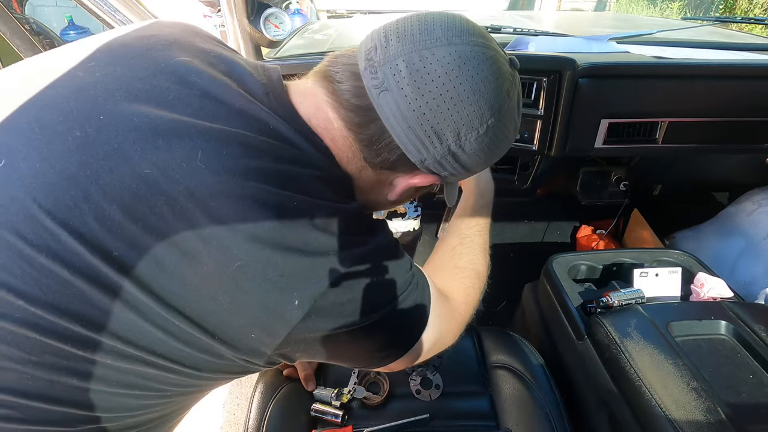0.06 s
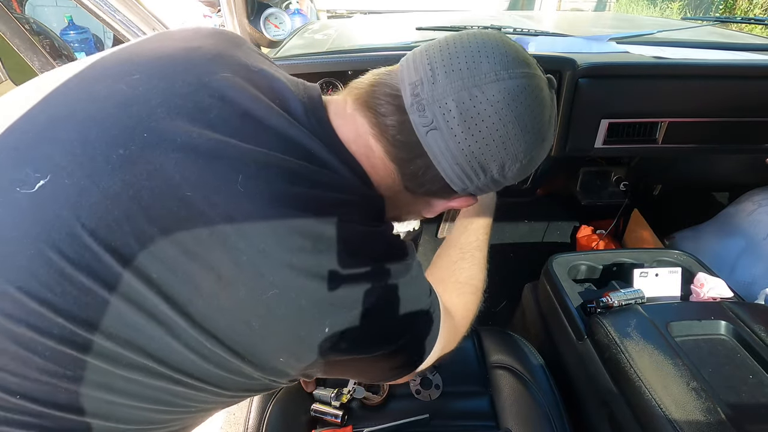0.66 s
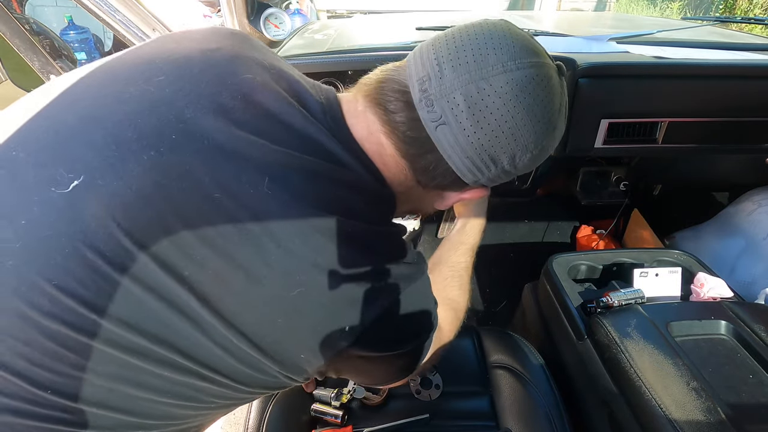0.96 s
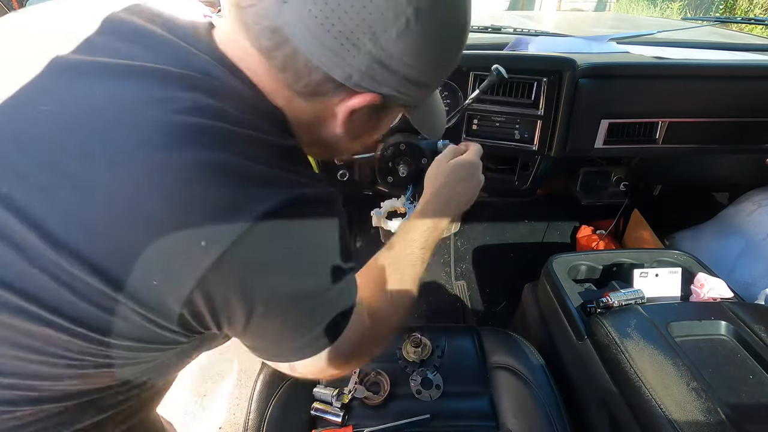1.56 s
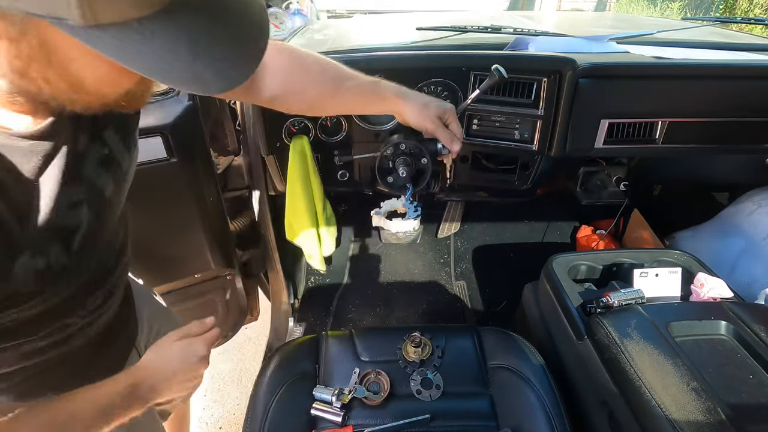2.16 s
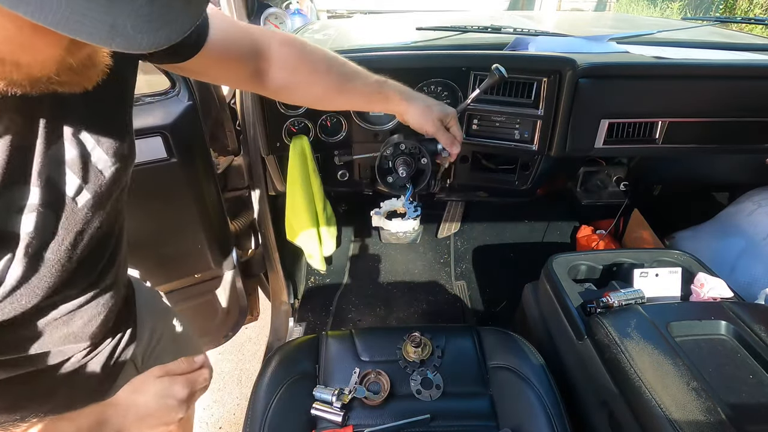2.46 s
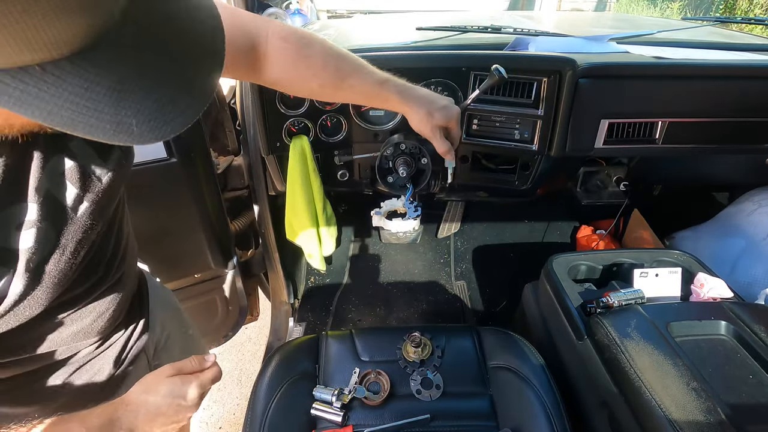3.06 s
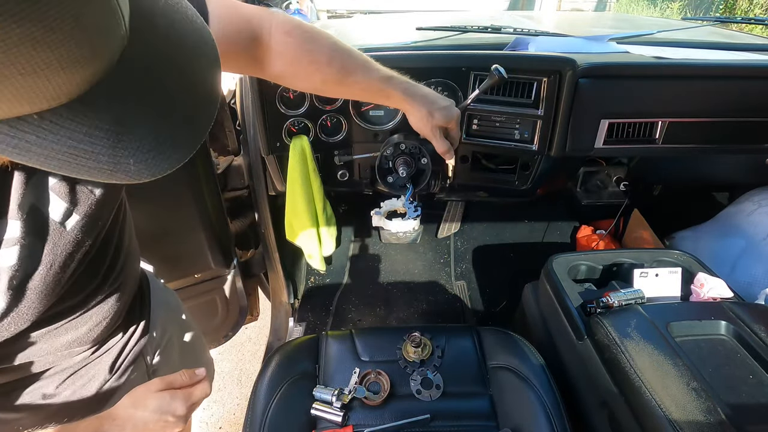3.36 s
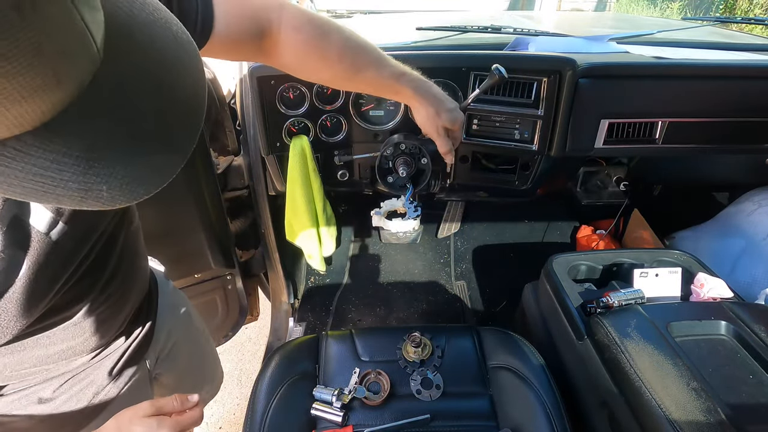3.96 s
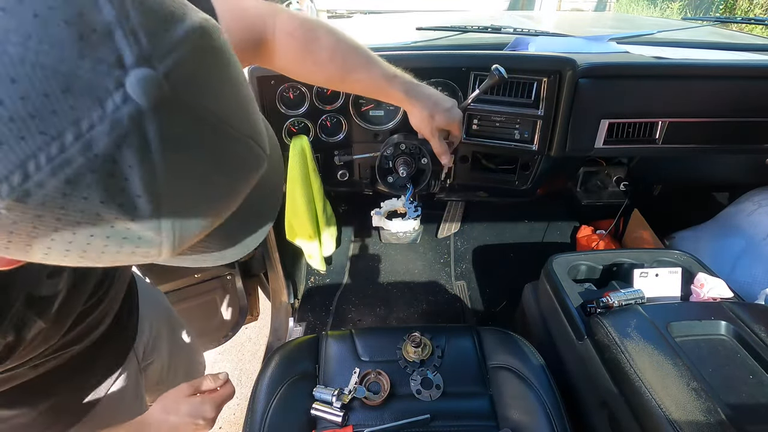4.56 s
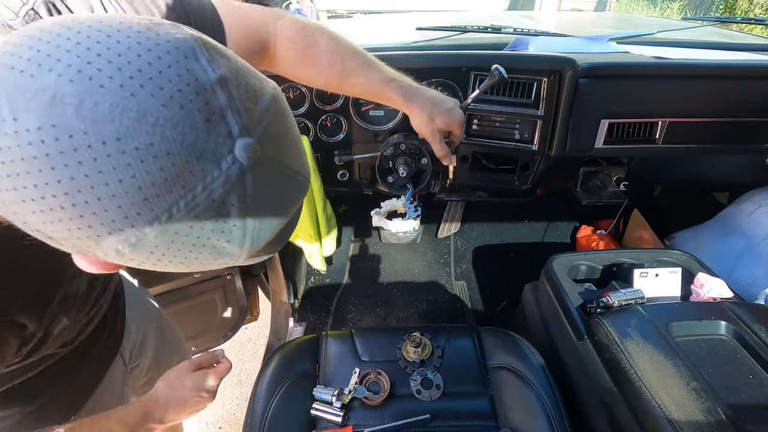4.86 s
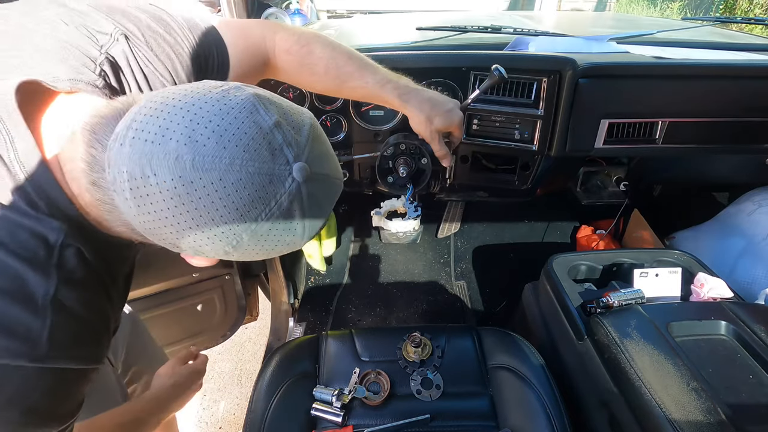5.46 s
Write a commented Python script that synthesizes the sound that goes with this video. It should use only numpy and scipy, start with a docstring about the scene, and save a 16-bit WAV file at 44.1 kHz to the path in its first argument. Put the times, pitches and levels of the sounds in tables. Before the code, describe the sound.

Inside a parked truck with the door open, someone works a lock cylinder into the steering column, heard up close. Scattered small clicks and a brief tinkle of keys grow into sharper snaps, clinks and short scrapes, mixed with hollow taps on plastic and soft bumps. The clicking thins out, and a dull, low thud lands near the end. A low throbbing rumble and faint clothing rustle continue underneath.

```python
"""A low, throbbing rumble and a rustle of clothes: a man leans into a parked truck, door open.
The cab sways under his weight and the outdoors hums in its air modes. Close up, he works a lock
cylinder into the steering column: metal clicks and scrapes, detents snap, keys tinkle on their ring,
and the small cab answers each contact. Knuckles rap the shroud, his body bumps column and seat,
and near the end his weight lands on the sill with a boom."""
import sys
import numpy as np
from scipy import signal
from scipy.fft import rfft, irfft
from scipy.io import wavfile
from scipy.ndimage import uniform_filter1d

SR = 44100
rng = np.random.default_rng(int(sys.argv[2]) if len(sys.argv) > 2 else 0)


def waveform_to_disk(signal):
    """Save audio, clipped to [-1, 1], as 16-bit WAV at the path in sys.argv[1]."""
    frames = np.transpose(np.atleast_2d(signal))
    scaled = np.clip(frames, -1, 1) * 32767
    samples = np.round(scaled).astype(np.int16)
    wavfile.write(sys.argv[1], SR, samples)


N = 251370
TIME = np.arange(N) / SR
AGE = np.arange(SR * 3 // 10) / SR   # seconds into a one-shot


def from_db(db):
    """Decibels to gain."""
    return 10 ** (np.asarray(db) / 20)


def rms(x):
    """Root mean square."""
    return np.sqrt(np.mean(x ** 2) + 1e-20)


def in_time(rows):
    """Each column of an automation curve at every sample."""
    times, *columns = np.transpose(rows)
    return [np.interp(TIME, times, column) for column in columns]


def at_hz(points, hz):
    """Gain of an EQ curve at the given frequencies."""
    f, db = np.transpose(points)
    return from_db(np.interp(np.log(hz + 1), np.log(f), db))


def add(out, s, sound):
    """Mix a stereo one-shot in at time s."""
    i = max(round(s * SR), 0)
    out[:, i:i + sound.shape[-1]] += sound[..., :max(N - i, 0)]


def attack(rise_s):
    """Exponential onset."""
    return 1 - np.exp(-AGE / rise_s)


def fade(t60):
    """Exponential decay, 60 dB down after t60 seconds."""
    return from_db(-60 * AGE / t60)


def stroke(start, end, edge_s):
    """A gate with sloped edges."""
    return np.clip(np.minimum(TIME - start, end - TIME) / edge_s, 0, 1)


def band(x, low_hz, high_hz, order=4):
    """Causal band-pass."""
    sos = signal.butter(order, [low_hz, min(high_hz, .45 * SR)], "band", fs=SR, output="sos")
    return signal.sosfilt(sos, x)


def stereo(mid, side):
    """Left and right from mid and side."""
    return np.array([mid + side, mid - side])


# Stereo width, side relative to mid: f/Hz, level/dB
WIDTH = [(30, -36), (120, -23), (250, -13), (500, -4.5), (2000, -5), (8000, -6.5), (13000, -4)]
def coloured(spectrum, size=N, grain=1):
    """Stereo noise of a given colour, wider in the treble; rms 1."""
    hz = np.arange(size // 2 + 1) * SR / size
    roll_off = 1 / (1 + (hz / spectrum[-1][0]) ** 4) / (1 + (spectrum[0][0] / (hz + 1)) ** 4)
    mid, side = rfft(rng.standard_normal((2, size)) * grain) * at_hz(spectrum, hz) * roll_off
    noise = stereo(irfft(mid, size), irfft(side * at_hz(WIDTH, hz), size))
    return noise / rms(noise)


def evened(x, span_s):
    """Noise with its slow swells levelled out."""
    power = uniform_filter1d(np.mean(x ** 2, axis=0), max(int(span_s * SR), 2))
    return x / np.sqrt(power + 1e-12)


def tilted(db, tilt, hz, pivot_hz=1820):
    """Level of a hit at a pitch: a sharp one favours the treble, a blunt one the bass."""
    return db + tilt * np.log2(hz / pivot_hz)


def struck(modes, pitch=1, spread_db=2, width=0.41, rise_s=0.00049):
    """One hit on a set of modes: each rings at its own strength, left and right a little out of step."""
    ring = 0
    for hz, db, t60 in modes:
        strength = from_db(db + spread_db * rng.standard_normal())
        phase = 2 * np.pi * (hz * pitch * AGE + rng.random()) + width * rng.standard_normal((2, 1))
        ring += strength * fade(t60) * np.sin(phase)
    return ring * attack(rise_s)


# The cab rocks as he leans and pushes: t/s, level/dB
ROCKING = [(0.0, -46), (0.44, -36), (0.73, -47.5), (0.93, -37), (1.0, -54), (1.41, -44), (1.48, -34),
           (1.65, -50.5), (2.24, -37.5), (2.36, -53), (2.44, -31.5), (3.13, -49.5), (3.48, -33),
           (4.29, -47), (5.12, -44.5), (5.26, -35), (5.32, -49), (5.7, -47.5)]
# Its sub-heavy colour: f/Hz, level/dB
ROCKING_SPECTRUM = [(21, -4.5), (37, -1), (52, -7), (70, -13), (105, -19), (160, -22), (300, -54)]
def rocking(jolt_db=7.5, jolt_rise_s=0.014, jolt_t60=0.58):
    """The cab sways under his weight, and every bump adds a jolt that dies away."""
    sway_db, = in_time(ROCKING)
    power = from_db(sway_db) ** 2
    for s, db in BUMPS:
        age = np.maximum(TIME - s, 0)
        jolt = from_db(db + jolt_db - 60 * age / jolt_t60) * (1 - np.exp(-age / jolt_rise_s))
        power += jolt ** 2
    return np.sqrt(power) * evened(coloured(ROCKING_SPECTRUM), 0.12)


# A low hum nearby throbs and speeds up: t/s, pulse rate/Hz, level/dB
THROB = [(0, 9.8, -52), (.7, 8.65, -49.5), (2, 11.1, -52.5), (3.9, 12, -60.5), (4.3, 11.6, -53.5),
         (5.7, 14.3, -55.5)]
def throb(hz=158, wander_hz=9, sharpness=5.2, lead_beats=0.045):
    """A low tone swells once a beat; its pitch wanders."""
    rate_hz, db = in_time(THROB)
    swell = np.abs(np.cos(np.pi * (np.cumsum(rate_hz) / SR + lead_beats))) ** sharpness
    wander = np.interp(TIME, np.linspace(0, TIME[-1], 120), rng.standard_normal(120))
    tone = swell * np.sin(2 * np.pi * np.cumsum(hz + wander_hz * wander) / SR)
    return from_db(db) * tone / rms(tone)


# The cab's air modes: f/Hz, bandwidth/Hz, level/dB
CAB_MODES = [(100.6, 52, -61.5), (155, 37.4, -52), (237.2, 16.6, -56.5), (316.7, 68, -61.5), (500, 84, -75)]
def cab_hum(follows=0.29):
    """Outdoor rumble hums in the cab's air modes, gently riding the throb's level."""
    out = np.zeros((2, N))
    for hz, width_hz, db in CAB_MODES:
        radius = np.exp(-np.pi * width_hz / SR)
        resonator = [1, -2 * radius * np.cos(2 * np.pi * hz / SR), radius ** 2]
        drive = rng.standard_normal((2, N + SR))   # a second of pre-roll lets the mode settle
        mid, side = signal.lfilter([1, 0, -1], resonator, drive)
        mode = band(stereo(mid, side * at_hz(WIDTH, hz)), hz / 2, hz * 1.38)[:, SR:]
        out += from_db(db) * evened(mode, 0.29)
    _, throb_db = in_time(THROB)
    return out * from_db(follows * (throb_db - throb_db.mean()))


# Sliding clothes and background: t/s, cloth level/dB, hiss level/dB
RUSTLE = [(0.0, -72, -74.5), (0.62, -62, -73.5), (0.92, -69, -68), (1.14, -69.5, -76), (2.02, -65.5, -66),
          (2.16, -67.5, -75), (2.57, -69, -71), (3.06, -70.5, -74.5), (3.57, -65, -71),
          (3.81, -69.5, -77.5), (4.02, -72.5, -80), (4.16, -69, -76.5), (4.38, -69, -74.5),
          (4.79, -66, -74.5), (5.24, -68, -69), (5.7, -67.5, -72.5)]
# The cloth's soft body: f/Hz, level/dB
CLOTH_SPECTRUM = [(350, 10), (600, -2), (850, -8), (1100, 2), (1350, 2.5), (1900, -4.5), (3300, -17),
                  (6000, -24)]
# The airy hiss on top: f/Hz, level/dB
HISS_SPECTRUM = [(2000, 2), (3500, -6.5), (5600, -2.5), (7000, -5.5), (9500, -14), (12300, -17),
                 (14000, -29)]
def rustle(catches_per_s=500, trim_db=1):
    """Threads catch and let go as his clothes slide: a grainy texture under a smooth hiss."""
    cloth_db, hiss_db = in_time(RUSTLE)
    fibres = (rng.random(N) < catches_per_s / SR) + 0.2
    cloth = from_db(cloth_db) * coloured(CLOTH_SPECTRUM, grain=fibres)
    hiss = from_db(hiss_db) * coloured(HISS_SPECTRUM)
    return from_db(trim_db) * (cloth + hiss)


# Metal clicks inside the lock: t/s, level/dB, brightness/(dB per octave)
CONTACTS = [(.072, -61, -4), (0.114, -62, -5.5), (0.296, -54.5, -6), (0.534, -63, -11), (0.86, -61.5, 4),
            (0.942, -52, 6.5), (1.006, -60.5, -2), (1.0412, -60, -9), (1.06, -59.5, -6.5),
            (1.159, -59.5, 2), (1.353, -57.5, 0.5), (1.371, -51.5, -7.5), (1.382, -64, 5),
            (1.431, -59.5, -3), (1.664, -61.5, -0.5), (2.053, -54.5, -3), (2.121, -46.5, 0),
            (2.135, -52.5, 2), (2.375, -49, 2), (2.481, -52.5, 2), (2.501, -45, -0.5), (2.509, -55, 0),
            (2.528, -59.5, 0.5), (2.682, -62.5, -5.5), (2.7444, -62.5, -12.5), (2.859, -56.5, 2.5),
            (3.0362, -56.5, -5), (3.182, -53, -0.5), (3.228, -60, 1.5), (3.241, -52, -1),
            (3.359, -47.5, -5.5), (3.4181, -57, 4), (3.487, -58.5, -4.5), (3.531, -40, -5.5),
            (3.5363, -52, -0.5), (3.621, -64.5, -0.5), (3.676, -52, -2.5), (3.744, -52.5, -5),
            (3.7501, -49, -0.5), (4.185, -64, -1.5), (4.2581, -65.5, 2), (4.564, -59.5, -2.5)]
# One band each for column, housing, pins and small parts:
# low f/Hz, high f/Hz, echo build-up/s, cab t60/s, direct level/dB, band level/dB
LOCK_PARTS = [(362, 1540, 0.0099, 0.12, -0.5, -12.5), (1055, 3700, 0.0003, 0.1, -9, 0.5),
              (3550, 7100, 0.0005, 0.095, -7, -1.5), (8150, 12700, 0.00016, 0.055, -9, -21)]
# The ring of lock and column: f/Hz, level/dB, t60/s
LOCK_MODES = [(493, 14.5, 0.049), (790, -2, 0.035), (1020, 6.5, 0.14), (1384, 3.5, 0.073),
              (1576, 28.5, 0.0042), (2070, 16.5, 0.01), (2224, 11, 0.036), (2640, 5, 0.026),
              (2864, 14.5, 0.021), (4280, 5, 0.0035), (4970, 15.5, 0.014), (6290, 14, 0.011),
              (8246, 21, 0.019), (10600, 1, 0.044)]
def contacts(crack_db=21, spread_db=-4.5, side_db=-6):
    """Each contact cracks and rings the lock's modes; dash and glass throw back dense early echoes."""
    out = np.zeros((2, N))
    onset = slice(SR // 400, SR // 55)   # this stretch sets a click's level
    hz, mode_db, t60 = np.transpose(LOCK_MODES)
    rings = np.sin(2 * np.pi * hz[:, None] * AGE) * fade(t60[:, None])
    for low, high, build_s, cab_t60, direct_db, part_db in LOCK_PARTS:
        in_band = (hz >= low) & (hz < high)
        echo_shape = fade(cab_t60) * attack(build_s)
        echo_shape /= np.sqrt(np.sum(echo_shape ** 2))
        for s, contact_db, tilt in CONTACTS:
            db = part_db + tilted(contact_db, tilt, np.sqrt(low * high))
            strengths = from_db(mode_db + spread_db * rng.standard_normal(len(hz)))
            polarity = rng.choice([-1, 1], len(hz))
            strike = (strengths * polarity * in_band) @ rings
            strike[0] += from_db(crack_db) * SR / (high - low)
            mid, side = rng.standard_normal((2, len(AGE))) * echo_shape
            mid[0] += from_db(direct_db)
            cab = stereo(mid, from_db(side_db) * side)
            echoed = signal.fftconvolve(cab, strike[None], axes=1)[:, :len(AGE)]
            click = band(echoed, low, high, order=3)
            add(out, s, from_db(db) * click / rms(click[:, onset]))
    return out


def cab_dip(x, hz=720, width_hz=300):
    """Echoes off the dash cancel a narrow band of the lock's lower mids."""
    return signal.lfilter(*signal.iirnotch(hz, hz / width_hz, fs=SR), x)


# Knuckles and the cylinder's end rap the column's shroud: t/s, level/dB, pitch/ratio
KNOCKS = [(.283, -49.5, 0.8), (1.0415, -48.5, 0.98), (1.061, -46.5, 0.93), (.946, -54, 0.82),
          (1.385, -47, 0.92), (1.441, -42, 0.72), (1.712, -48.5, 0.91), (2.133, -52, 0.865),
          (3.243, -46, 0.9), (3.539, -53, 0.91), (5.114, -43.5, 0.91)]
# The shroud's ring at pitch ratio 1: f/Hz, level/dB, t60/s
SHROUD_MODES = [(521, 1.5, 0.035), (880, -6.5, 0.029), (1130, -10, 0.04), (1318, -4, 0.05)]
def knocks():
    """Firm taps on hard plastic: a short hollow ring, pitched by where they land."""
    out = np.zeros((2, N))
    for s, db, pitch in KNOCKS:
        add(out, s, from_db(db) * struck(SHROUD_MODES, pitch))
    return out


# Arm and body thud on column and seat: t/s, level/dB
BUMPS = [(.29, -49.5), (1.043, -50), (1.432, -44), (2.058, -45), (2.1, -48), (2.378, -47), (2.505, -50),
         (3.255, -45), (3.363, -54.5), (3.532, -47), (3.755, -48), (5.114, -40), (5.169, -58)]
# The cab's low boom: f/Hz, level/dB
BOOM_SPECTRUM = [(40, -33), (90, -3.5), (160, -0.5), (350, -3.5), (500, -18)]
# The panel's midrange slap: f/Hz, level/dB
SLAP_SPECTRUM = [(280, 0), (500, 1), (750, -3), (1300, -13), (1700, -29)]
def bumps(boom_t60=0.42, boom_db=4, slap_t60=0.3, slap_db=-41, hard_db=-35, brightening=1.64):
    """Soft blows boom in the cab; harder ones bring out the panel's slap, which dies sooner."""
    out = np.zeros((2, N))
    for s, db in BUMPS:
        boom = evened(coloured(BOOM_SPECTRUM, len(AGE)), 0.0255) * fade(boom_t60) * attack(0.00029)
        slap = evened(coloured(SLAP_SPECTRUM, len(AGE)), 0.0017) * fade(slap_t60) * attack(0.0007)
        slap_gain = from_db(slap_db + brightening * (db - hard_db))
        add(out, s, from_db(db + boom_db) * boom + slap_gain * slap)
    return out


# A loose part of the lock sings briefly on one note: t/s, level/dB, f/Hz
CLINKS = [(0.324, -43, 1515), (.861, -48.5, 1680), (0.944, -40, 2800), (0.944, -36, 5370),
          (1.158, -40, 1520), (1.712, -51.5, 1780), (2.122, -35.5, 2800), (2.502, -28.5, 2370),
          (2.503, -34, 3800), (2.532, -38.5, 3120), (2.748, -43, 940), (3.006, -46, 1490),
          (3.419, -35, 3240), (3.532, -31, 2190), (3.537, -37, 1060), (3.746, -44.5, 2800),
          (4.257, -46.5, 3380)]
def clinks(t60=0.067, rise_s=0.0011, gain_db=-4, skirt_ratio=1.17):
    """One resonance of a loose part, blurred by its own chatter and the cab's echoes."""
    out = np.zeros((2, N))
    for s, db, hz in CLINKS:
        peak = [(hz / 2, -45), (hz / skirt_ratio, -14), (hz, 0), (hz * skirt_ratio, -14), (hz * 2, -45)]
        ring = evened(coloured(peak, len(AGE)), 0.0051)
        add(out, s, from_db(db + gain_db) * ring * fade(t60) * attack(rise_s))
    return out


# Metal slides on metal: start t/s, end t/s, level/dB
SCRAPES = [(0.514, 0.87, -67.5), (1.317, 1.497, -58), (1.967, 2.129, -61), (2.568, 2.71, -65.5),
           (2.462, 2.502, -54.5), (3.33, 3.401, -57), (3.646, 3.695, -58)]
# The colour of its grit: f/Hz, level/dB
SCRAPE_SPECTRUM = [(700, -23), (1400, 1.5), (2200, -3.5), (4000, -3), (6500, -11.5), (12000, -18),
                   (14000, -32)]
def scrapes(slips_per_s=520, slip_floor=0.29, catches_per_s=70, catch_t60=0.019, flare_floor=0.72):
    """The cylinder slides in its bore: a dense run of tiny slips, flaring whenever a burr catches."""
    slips = (rng.random(N) < slips_per_s / SR) + slip_floor
    catches = 1.0 * (rng.random(N) < catches_per_s / SR)
    flares = signal.fftconvolve(catches, fade(catch_t60))[:N] + flare_floor
    strokes = sum(from_db(db) * stroke(start, end, edge_s=0.027) for start, end, db in SCRAPES)
    return strokes * flares / rms(flares) * coloured(SCRAPE_SPECTRUM, grain=slips)


# The bright crack of thin metal: f/Hz, level/dB
CRACK_SPECTRUM = [(5500, 1), (8000, -4), (13000, -17)]
def flicked_metal(hits, modes, detune, ring_db=-3.0, crack_db=-3.5, crack_t60=0.069):
    """Thin metal gives a chattering crack and a high shimmer, each hit pitched a little differently."""
    out = np.zeros((2, N))
    for s, db, tilt in hits:
        pitch = 1 + detune * rng.standard_normal()
        hit_modes = [(hz, tilted(level, tilt, hz, pivot_hz=7200), t60) for hz, level, t60 in modes]
        ring = struck(hit_modes, pitch, width=0.62)
        colour = [(hz, tilted(level, tilt, hz)) for hz, level in CRACK_SPECTRUM]
        crack = coloured(colour, len(AGE)) * fade(crack_t60)
        add(out, s, from_db(db) * (from_db(ring_db) * ring + from_db(crack_db) * crack))
    return out


# Tiny ticks of key on lock: t/s, level/dB, brightness/(dB per octave)
TICKS = [(.5477, -56, 3.5), (1.4616, -52, 1), (2.684, -54, 9.5), (2.9667, -67, 0), (3.6222, -64.5, 12),
         (3.972, -72, 4), (4.1011, -72, 2), (4.425, -68, -4), (4.5057, -66.5, -2)]
# The ring of a key's edge: f/Hz, level/dB, t60/s
EDGE_MODES = [(4312, -4, 0.11), (4700, -3, 0.12), (7550, 2, 0.049), (10160, -16, .042), (10970, -6, 0.087),
              (11860, -5.5, 0.086), (12500, -10, 0.068)]
def key_ticks():
    """A key's edge catches the lock and rings briefly."""
    return flicked_metal(TICKS, EDGE_MODES, detune=0.025)


# A flurry of tinkles: t/s, level/dB, brightness/(dB per octave)
TINKLES = [(.659, -70, 15), (.7148, -60, 6), (0.7493, -61, 2), (.7892, -55.5, -2), (0.8431, -50.5, -5),
           (.8655, -50.5, -9), (.9, -65, 0), (.947, -60, 0)]
# The split ring's shimmer: f/Hz, level/dB, t60/s
SPLIT_RING_MODES = [(7214, -5, 0.22), (9017, -17, 0.17), (12100, -8, 0.087), (15200, -22, .07)]
def ring_tinkles():
    """The thin split ring pings against the keys."""
    return flicked_metal(TINKLES, SPLIT_RING_MODES, detune=0.005)


# Keys knock together: t/s, level/dB, brightness/(dB per octave)
KEY_TOUCHES = [(0.747, -74, 10), (0.946, -46.5, 15), (1.157, -56.5, -24), (2.12, -53.5, -9),
               (2.862, -66.5, -56), (3.18, -61, -1), (3.622, -70, 10), (3.953, -82, -28),
               (4.102, -77.5, -5)]
# The keys' chime: f/Hz, t60/s
KEY_MODES = [(5903, 0.28), (6882, 0.21), (7235, 0.12)]
# The balance of those modes: level/dB
KEY_MODE_DB = [-7.5, -0.5, -16]
def keys(gain_db=13, pan_db=2, held_s=0.034, rise_s=0.0062):
    """Flat keys ring on a few pure modes until a neighbour or a finger stills them."""
    out = np.zeros((2, N))
    envelope = attack(rise_s) / (1 + (AGE / held_s) ** 4)
    for s, touch_db, tilt in KEY_TOUCHES:
        for (hz, t60), mode_db in zip(KEY_MODES, KEY_MODE_DB):
            db = tilted(touch_db + mode_db, tilt, hz, pivot_hz=6880)
            pan = pan_db * rng.standard_normal() * np.array([[1], [-1]])
            ring = np.sin(2 * np.pi * hz * AGE + rng.normal(0, 0.41, (2, 1))) * fade(t60)
            add(out, s, from_db(db + gain_db + pan) * ring * envelope)
    return out


# Crisp detent snaps: t/s, level/dB, f/Hz
DETENTS = [(1.16, -31.5, 5900), (1.352, -45, 4020), (1.3815, -46, 4000), (2.956, -49, 5800),
           (2.137, -29, 5800), (2.374, -23, 6090), (2.481, -32, 5850), (2.501, -29.5, 5600),
           (2.86, -36.5, 5700), (3.182, -35, 6000), (3.24, -38.5, 6000), (3.4194, -32.5, 5730),
           (3.5366, -30, 6140), (3.676, -36, 4570), (3.7501, -29, 6200), (4.2583, -36, 5940),
           (4.563, -43, 5950)]
# The partials of a snap: pitch/ratio, level/dB
DETENT_PARTIALS = [(.845, -10), (1, 0), (1.14, -7)]
def detents(t60=0.0098, rise_s=0.00058):
    """A detent spring lets go: a few milliseconds of bright, heavily damped ringing."""
    out = np.zeros((2, N))
    for s, db, hz in DETENTS:
        ping = sum(from_db(level) * np.sin(2 * np.pi * hz * ratio * AGE)
                   for ratio, level in DETENT_PARTIALS)
        add(out, s, from_db(db) * ping * fade(t60) * attack(rise_s))
    return out


# Hand strokes: start t/s, end t/s, level/dB, f/Hz, resonance Q
RUBS = [(1.553, 1.626, -68.5, 2300, 12), (2.72, 2.812, -63, 1380, 5.6), (4.293, 4.622, -66, 1310, 18),
        (4.776, 4.885, -68.5, 1400, 8.3)]
def rubs(edge_s=0.015):
    """A hand rubs smooth trim, and the friction noise gathers in one resonance."""
    out = np.zeros((2, N))
    for start, end, db, hz, q in RUBS:
        friction = band(rng.standard_normal((2, N)), hz / 2, 2 * hz)
        mid, side = signal.lfilter(*signal.iirpeak(hz, q, fs=SR), friction)
        rub = stereo(mid, side * at_hz(WIDTH, hz)) / rms(mid)
        out += from_db(db) * stroke(start, end, edge_s) * rub
    return out


def tread(start_s=5.114, db=-35, hz=88, t60=1.4, rise_s=0.01):
    """His weight lands on the sill and the floor pan booms on one broad, low resonance."""
    out = np.zeros((2, N))
    boom = evened(coloured([(hz / 2, -22), (hz, 0), (hz * 2, -22)], len(AGE)), 0.036)
    taper = 1 - (AGE / AGE[-1]) ** 2   # closes the tail within 0.3 s
    add(out, start_s, from_db(db) * boom * fade(t60) * attack(rise_s) * taper)
    return out


def scene(rocking_db=-1, lock_pan_db=0.3):
    """The lock work, a hair left of centre, over a bed of rustle, rocking and hum."""
    clothes = rustle()
    lock = contacts() + detents() + clinks() + keys() + ring_tinkles() + key_ticks() + scrapes()
    lock *= from_db([[lock_pan_db], [-lock_pan_db]])
    handling = knocks() + bumps() + tread() + rubs()
    rumble = from_db(rocking_db) * rocking() + cab_hum() + throb()
    return cab_dip(lock) + handling + rumble + clothes


def record(dry, cutoff_hz=15600):
    """A steep low-pass takes the very top off the mix."""
    return signal.sosfilt(signal.ellip(8, .3, 70, cutoff_hz, fs=SR, output="sos"), dry)


dry = scene()
out = record(dry)
waveform_to_disk(out)
```